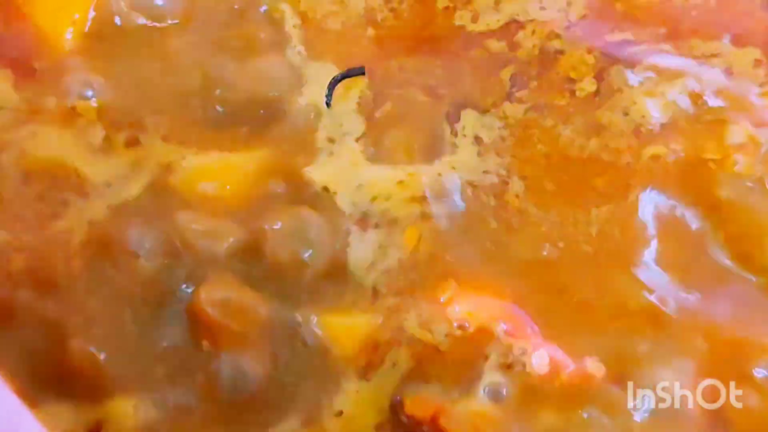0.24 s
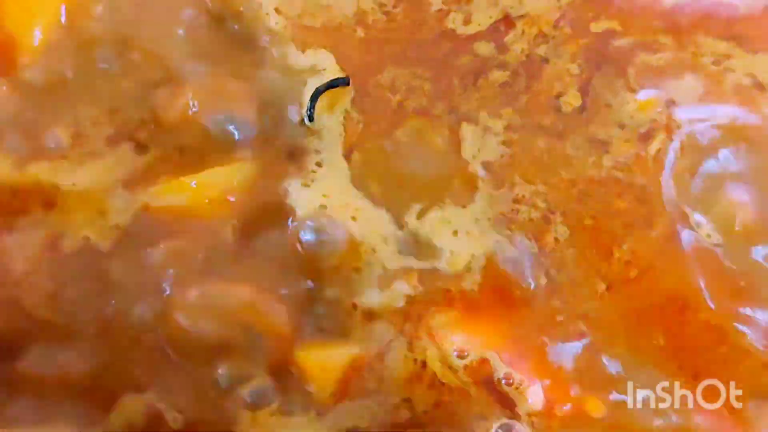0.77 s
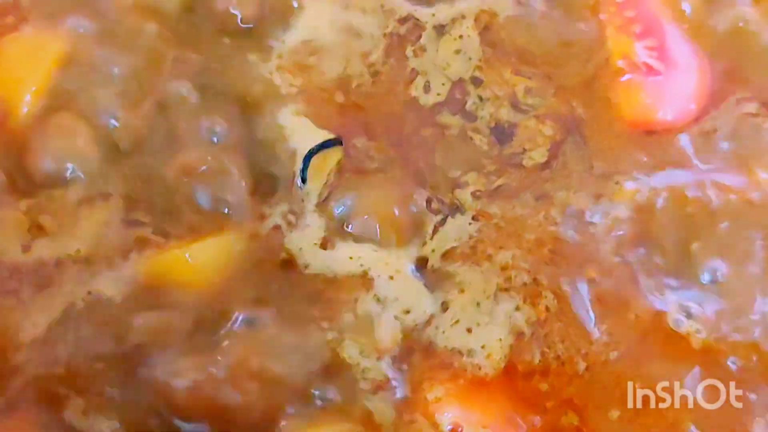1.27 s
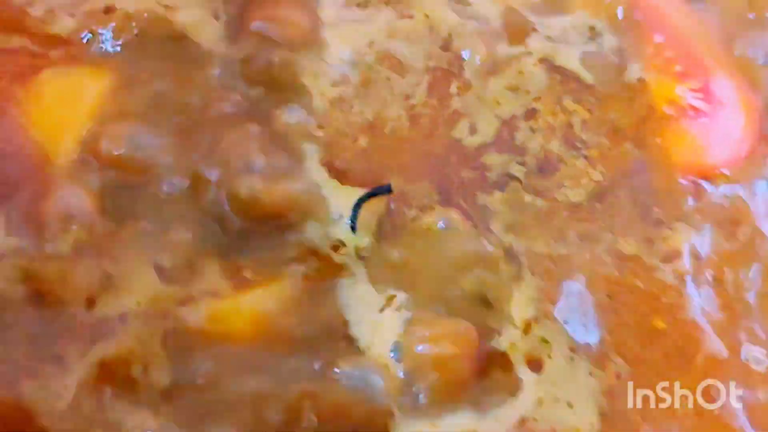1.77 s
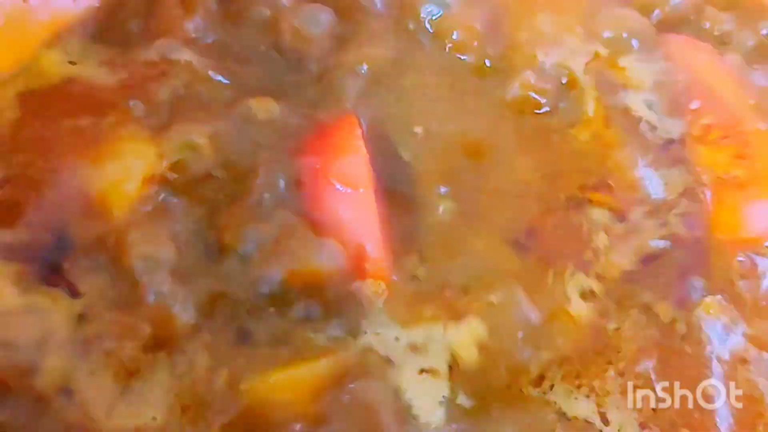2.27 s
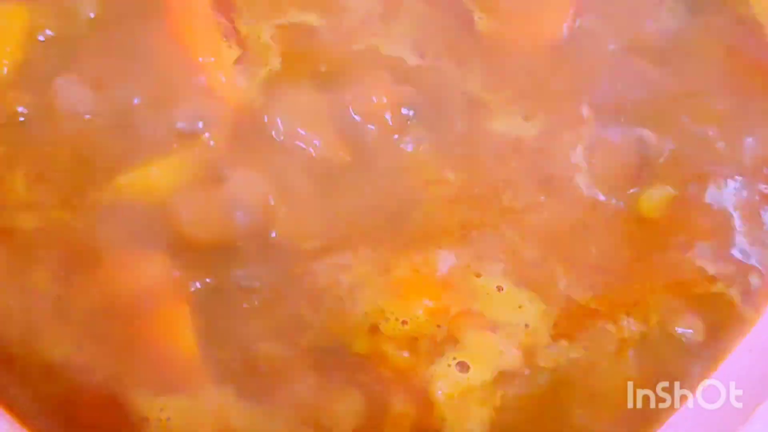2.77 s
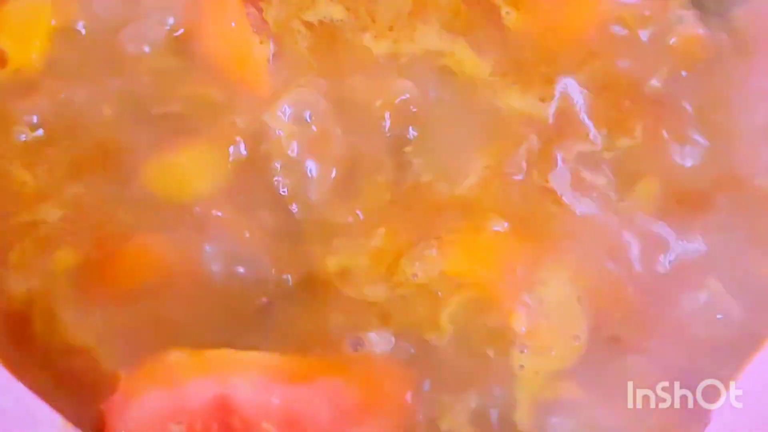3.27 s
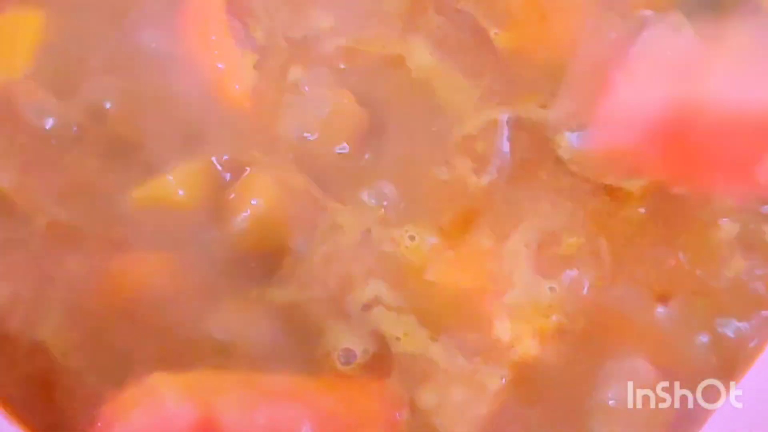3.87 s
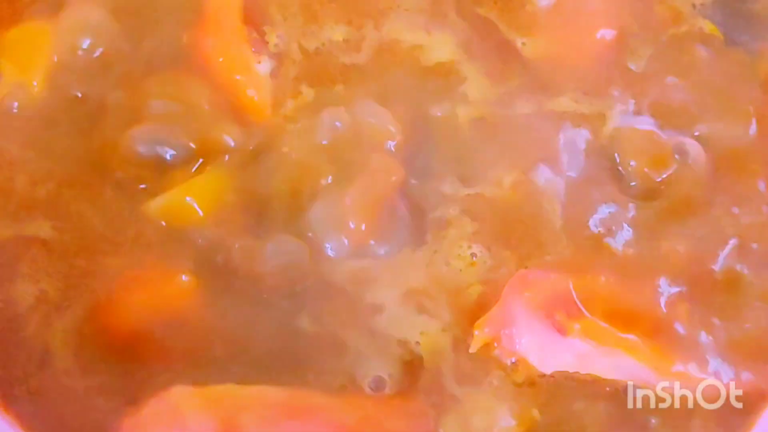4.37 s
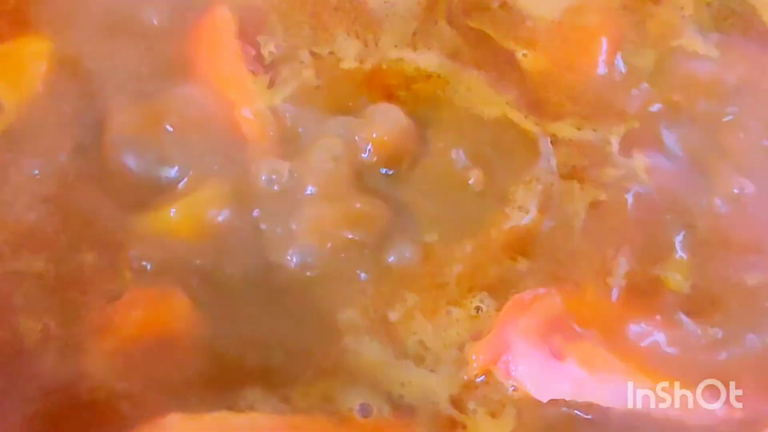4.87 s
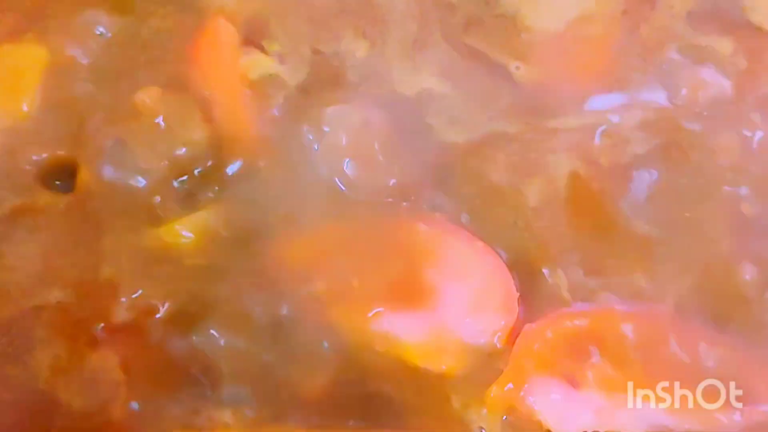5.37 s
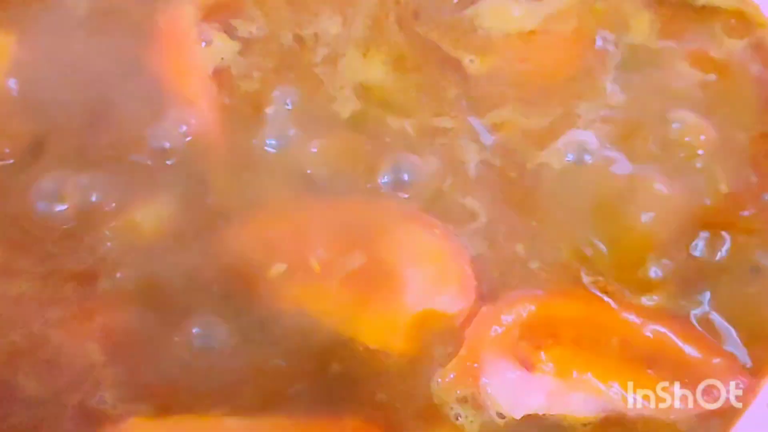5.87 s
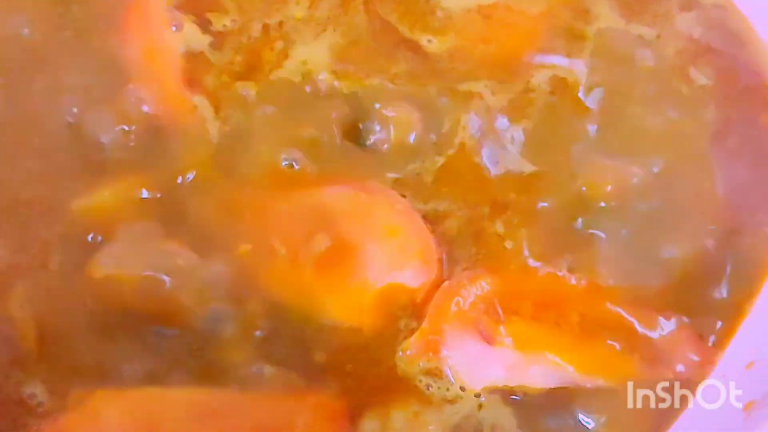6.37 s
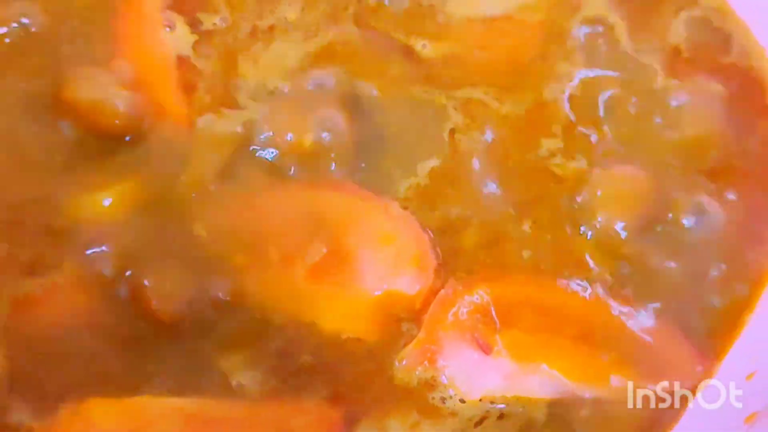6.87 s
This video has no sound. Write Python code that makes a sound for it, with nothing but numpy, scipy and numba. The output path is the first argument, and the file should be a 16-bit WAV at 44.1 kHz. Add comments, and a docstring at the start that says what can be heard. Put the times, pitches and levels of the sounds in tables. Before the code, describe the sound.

Close stereo listening above thick curry simmering on a gas stove in a kitchen. From 0 to 2.6 seconds the level is low: a soft rumbling roar of flame and boil, faint deep hum, fine fizzing ticks leaning left, and occasional muted plops around 0.5, 1.3 and 1.8. At 2.1 a piece drops in with a short wet slap and a tiny spray. At about 2.65 everything falls almost silent, then fades in by 3.0, noticeably louder. The boil is now dense, with hollow bubbles ringing in the pot, sharp bursting skins, thin steam hiss and high gas-jet whistle. Small slaps come at 3.1, 4.0 and 5.2. Low hum swells towards 4.3 and fades after 5. A gentle steam puff and faint thin whines pass between 5.5 and 6.3; a strong plop pops near 6.5, and simmering continues to the end at about 7.1.

```python
"""A kitchen, close above a pot of thick curry simmering on a gas stove, heard at a left and a right port.
Flame and boil are noise shaped by standing waves; steam hiss and jet whistles are noise in higher bands.
Machines and faint whines are wavering sines. Bubbles are damped gliding sines that excite the pot's air;
bursting skins are shorter ones, and dropped pieces splash as decaying noise with short ringing notes.
The sound dips once to near silence and fades back in louder."""
import sys
import numpy as np
from scipy import signal
from scipy.fft import rfft, irfft, next_fast_len
from scipy.io import wavfile
from scipy.ndimage import uniform_filter1d
from numba import njit

SR = 44100
rng = np.random.default_rng(int(sys.argv[2]) if len(sys.argv) > 2 else 0)


def master(y):
    """Save y as 16-bit WAV."""
    cut = np.clip(np.atleast_2d(y).T, -1, 1)
    pcm = np.round(cut * 32767)  # scale
    wavfile.write(sys.argv[1], SR, pcm.astype(np.int16))


N = 314433

DIP_S, BACK_S, FULL_S = 2.648, 2.672, 2.97  # near silent from, fading in from, full at
STEAM_HZ = 2200  # above this the steam hiss takes over from the roar
PLOP_LAG_S, TICK_LAG_S = 0.00017, 0.0004  # the right port hears bubbles later


def undb(db):
    """Decibel law: the amplitude gain of a level in dB."""
    return 10 ** (np.asarray(db) / 20)


def level(x, db):
    """Mean-square normalisation: scale to an rms level in dB."""
    return x * undb(db) / np.sqrt(np.mean(x ** 2))


def over_time(table):
    """Linear interpolation: a level curve at every sample."""
    s, db = np.transpose(table)
    return np.interp(np.arange(N) / SR, s, db)


def over_hz(table, hz):
    """Logarithmic frequency: a spectrum joined by straight lines on a log axis."""
    f, db = np.transpose(table)
    return np.interp(np.log(hz + 1), np.log(f + 1), db)


def before_after(levels):
    """Step function: one value until the sound fades back in, another from then on."""
    return np.where(np.arange(N) < BACK_S * SR, *levels)


def window(a, b):
    """Sine-power envelope: a swell from silence to silence between two times in s."""
    progress = np.clip((np.arange(N) / SR - a) / (b - a), 0, 1)
    return np.sqrt(np.sin(np.pi * progress).clip(0))


def walk(rate):
    """Slow random modulation: levels held 1 / rate s and smoothed twice; spread near 1."""
    hold = int(SR / rate)
    steps = np.repeat(rng.standard_normal(N // hold + 1), hold)
    smooth = uniform_filter1d(uniform_filter1d(steps, hold), hold)
    return 1.746 * smooth[:N]


def ring(x, hz, width):
    """Simple resonance: two poles, gain 1 at the centre, width in Hz."""
    return signal.lfilter(*signal.iirpeak(hz, hz / width, fs=SR), x)


@njit
def grains(n, start, hz, cycles, size, glide, rise):
    """Damped oscillation: a sine of rising pitch swells over `rise` cycles, loses 8.7 dB in `cycles`."""
    y = np.zeros(n)
    for k in range(len(start)):
        w, phase, fall, grow = 2 * np.pi * hz[k] / SR, 0., 1., 1.
        stop = min(n, start[k] + int(6 * cycles[k] * SR / hz[k]))
        for i in range(start[k], stop):
            phase += min(3., w * (1 + glide * phase / (2 * np.pi * cycles[k])))
            fall *= np.exp(-hz[k] / SR / cycles[k])
            grow *= np.exp(-hz[k] / SR / rise)
            y[i] += size[k] * fall * (1 - grow) * np.sin(phase)
    return y


def bubbles(s, db, hz, pan_db, cycles, glide, rise, lag_s=PLOP_LAG_S):
    """Interaural time and level difference: damped notes reach the nearer left port first and louder."""
    # the envelope's maximum is divided out, so db sets the peak
    top = rise * np.log(1 + cycles / rise)
    peak = np.exp(-top / cycles) * (1 - np.exp(-top / rise))
    cycles = cycles + 0 * s  # one value per bubble
    ports = []
    for arrival_s, gain_db in ((s, pan_db / 2), (s + lag_s, -pan_db / 2)):
        start = (arrival_s * SR).astype(np.int64)
        ports.append(grains(N, start, hz, cycles, undb(db + gain_db) / peak, glide, rise))
    return np.array(ports)


def swarm(count, lo_hz, hi_hz, db, spread_db, loud_db, patchy_db):
    """Clustered random process: time, level with a long upper tail, pitch and left minus right dB."""
    u = rng.random((count, 4)).T
    busy = np.cumsum(undb(patchy_db * walk(12)))
    s = np.interp(u[0], busy / busy[-1], np.arange(N) / SR)
    tail_db = -spread_db * np.log(np.maximum(u[1], .06))
    size_db = db + loud_db[(s * SR).astype(int)] + tail_db
    return s, size_db, lo_hz * (hi_hz / lo_hz) ** u[2], 1 + 7 * u[3]


# Gain of the side (half-difference) noise: f/Hz, level/dB
SIDE_GAIN = [(60, -21), (110, -17), (200, -14), (380, -9), (700, -0.5), (1290, 2), (2380, -3), (4400, -0.5),
             (15000, -1)]
# Balance of the noise between the ports: f/Hz, left minus right level/dB
PORT_TILT = [(60, -2.5), (110, 4.5), (200, -1), (380, 2), (700, 0), (1290, 1.5), (2380, 4.5), (4400, -1.5),
             (8120, -2), (15000, 5)]
LEAD = 0.61  # share of the mid noise that, in the treble, enters the side a quarter cycle ahead


def flicker(colour, swell_db, own_db, rate):
    """Band-filtered noise of mean-port rms 1: half octaves swell together and flicker alone."""
    n = next_fast_len(N)
    hz = np.arange(n // 2 + 1) * SR / n
    gain = colour(hz)
    mid, side = rfft(rng.standard_normal((2, n))) * gain
    side = side + 1j * LEAD * mid * hz / (hz + STEAM_HZ)
    side = side * undb(over_hz(SIDE_GAIN, hz))
    tilt = undb(over_hz(PORT_TILT, hz) / 2)
    ports = np.array([(mid + side) * tilt, (mid - side) / tilt])
    half_octave = 2 * np.log2(hz / 20 + 1e-9)
    out, swell = 0, walk(2.86)
    for band in range(20):
        share = np.cos(np.pi / 2 * np.clip(half_octave - band, -1, 1))
        if np.max(share * gain) > 1e-3 * np.max(gain):  # skip empty bands
            band_noise = irfft(ports * share, n)[:, :N]
            out = out + band_noise * undb(swell_db * swell + own_db * walk(rate))
    return out / np.sqrt(np.mean(out.mean(0) ** 2))


def tone(hz, waver):
    """Frequency modulation: a sine of rms 1 whose pitch wanders by the fraction `waver`."""
    pitch = hz * (1 + waver * walk(4.26))
    return np.sqrt(2) * np.sin(2 * np.pi * np.cumsum(pitch) / SR)


# Low hum, swelling after the dip and dying away in steps; it also wavers: t/s, level/dB
HUM_LEVEL = [(0, -59.5), (.7, -57), (2.63, -61.5), (2.67, -50), (4.3, -45.5), (4.9, -47.5), (5.3, -54),
             (6.05, -55.5), (6.6, -56.5), (7.13, -74)]
# Second machine tone, heard only until the fade-in: t/s, level/dB
DRONE_LEVEL = [(0, -58), (.55, -58), (.85, -69), (1.5, -65.5), (2.2, -68), (2.63, -73)]
HUM_HZ, DRONE_HZ, WHIRR_HZ = 44.3, 31, 242


def hums(roar_db):
    """Near-periodic machine vibration: three wavering sines, alike at both ports."""
    drone = tone(DRONE_HZ, 0.012) * undb(over_time(DRONE_LEVEL))
    drone = drone * before_after((1, 0))
    hum = tone(HUM_HZ, 0.012) * undb(over_time(HUM_LEVEL) + 1.0 * walk(9))
    whirr = tone(WHIRR_HZ, 0.0039) * undb(roar_db - 12.0 + 2.4 * walk(6))
    return hum + drone + whirr


# Faint tones that come and go: from t/s, to t/s, f/Hz, rms level/dB before swell and waver
THIN_TONES = [(3.25, 3.514, 2239, -68), (3.84, 4.157, 2250, -67.5), (5.6, 6.25, 2230, -65.5),
              (5.78, 6.1, 1785, -65.5), (5.7, 6.28, 2115, -72), (6.36, 6.7, 2220, -70),
              (6.06, 6.62, 3146, -71)]


def thin_tones():
    """Amplitude and phase modulation: sines swell, waver and fade, a quarter cycle apart at the ports."""
    t = np.arange(N) / SR
    port_cycles = np.array([[0], [.25]])
    out = 0
    for a, b, hz, db in THIN_TONES:
        envelope = undb(db + walk(10)) * np.sqrt(2) * window(a, b)
        cycles = hz * t + .08 * walk(8) + port_cycles
        out = out + envelope * np.sin(2 * np.pi * cycles)
    return out


# Spectral density shared by roar and steam, only its shape matters: f/Hz, level/dB (per Hz)
NOISE_SPECTRUM = [(16, -13), (60, -5), (123, -4), (222, -3), (293, -13), (642, -16), (759, -20),
                  (1330, -22), (3000, -30), (3750, -28), (5230, -36), (6180, -30.5), (7600, -41),
                  (10000, -41.5), (16000, -40)]
# Standing waves of the kitchen and the pot's air: f/Hz, width/Hz (where the dB halve), lift/dB
STANDING_WAVES = [(26.4, 20, 10), (86.4, 18.5, 13.5), (102.4, 8.7, -12), (129.6, 37, 4.5), (197, 21.7, 6.5),
                  (235.8, 15, 7), (348.3, 51, 9), (413.7, 8.7, 9.5), (503, 25, 7), (645, 62, 11),
                  (1333, 160, 6.5), (2170, 840, 6.5)]


def roar_colour(hz):
    """Room modes: standing waves lift or dip the rumble of flame and boil."""
    lift_db = sum(db / (1 + (2 * (hz - f) / w) ** 2) for f, w, db in STANDING_WAVES)
    return undb(over_hz(NOISE_SPECTRUM, hz) + lift_db) / np.sqrt(1 + (hz / STEAM_HZ) ** 8)


def steam_colour(hz):
    """High-pass filtering: steam hiss is the upper part of the same spectrum."""
    return undb(over_hz(NOISE_SPECTRUM, hz)) / np.sqrt(1 + (STEAM_HZ / (hz + 1)) ** 8)


# Whistle bands of the gas jets: f/Hz, width/Hz (two standard deviations), relative level/dB
JET_BANDS = [(5982, 370, -1), (6410, 990, -5.5), (11910, 410, -5.5), (12840, 950, -15), (11200, 1020, -12)]
JET_ECHO_S, JET_ECHO = 0.00796, 0.46  # delay and strength of an echo in the burner


def jet_colour(hz):
    """Comb filtering: a short echo ripples the jets' whistle bands."""
    bands = sum(undb(db) * np.exp(-(2 * (hz - f) / w) ** 2 / 2) for f, w, db in JET_BANDS)
    return bands * np.abs(1 + JET_ECHO * np.exp(2j * np.pi * hz * JET_ECHO_S))


# The upper whistle's own swell: t/s, gain/dB at the band centre
UPPER_WHISTLE = [(0, -3.5), (2.63, 1), (3.2, 0.5), (4.2, 2.5), (5.8, 3), (6.4, -2.5), (7.13, 0)]


def jets():
    """Narrow-band jet noise: whistles flicker and the upper one swells by a resonance of varying gain."""
    jet = flicker(jet_colour, swell_db=0.42, own_db=1.2, rate=25)
    return jet + (undb(over_time(UPPER_WHISTLE)) - 1) * ring(jet, 11900, 4000)


# A swell of steam: from t/s, to t/s, f/Hz, width/Hz of each resonance, rms level/dB before the swell
STEAM_PUFF = (5.5, 6, 2800, 2200, -60.5)


def puff():
    """Uncorrelated turbulence noise: a brief hiss through two equal resonances, unrelated at the ports."""
    a, b, hz, width, db = STEAM_PUFF
    hiss = ring(ring(rng.standard_normal((2, N)), hz, width), hz, width)
    return level(hiss, db) * window(a, b) ** 2


# Pieces and drops slap the surface: t/s, rms level/dB before the decay, f/Hz, left minus right level/dB
SURFACE_SLAPS = [(2.0906, -54, 10000, 2), (2.096, -43.5, 9000, -5), (2.1035, -45.5, 4500, 4),
                 (2.195, -50.5, 6000, 1), (3.102, -46, 9000, 8), (4.0164, -41, 13000, -2),
                 (4.0231, -50, 9000, 3), (5.243, -41.5, 8000, 2)]
# Short ringing notes within the slaps: t/s, peak level/dB (mean of the ports), f/Hz
SLAP_RINGS = [(2.097, -47, 11800), (2.103, -48.5, 2370), (4.0163, -42, 10500), (4.0203, -47, 3100),
              (4.0231, -51, 6000), (5.243, -48, 3570), (5.2432, -50, 11500)]
SLAP_WIDTH, SLAP_RISE_S, SLAP_T60_S = 1.6, .0002, .007  # width is a multiple of the centre
SPRAY_DB, SPRAY_T60_S = -13, .045  # a softer spray trails each slap


def slaps():
    """Impulsive impact noise: two exponential decays shape each spray, with short damped sines added."""
    out = np.zeros((2, N))
    t = np.arange(int(.12 * SR)) / SR
    fall = 1000. ** (-t / SLAP_T60_S) + undb(SPRAY_DB) * 1000. ** (-t / SPRAY_T60_S)
    fall = fall * np.minimum(t / SLAP_RISE_S, 1)
    for s, db, hz, pan in SURFACE_SLAPS:
        noise = ring(rng.standard_normal((2, len(t))), hz, SLAP_WIDTH * hz)
        spray = level(noise, db) * fall
        i = int(s * SR)
        out[:, i:i + len(t)] += spray * undb([[pan / 2], [-pan / 2]])
    s, db, hz = np.transpose(SLAP_RINGS) * 1.
    # cycles in proportion to pitch: every ring decays equally fast
    return out + bubbles(s, db, hz, pan_db=1.8, cycles=hz * 0.00089, glide=0.043, rise=2.4, lag_s=0.)


# Single small bursts, loud and soft, placed by time: t/s, peak level/dB (mean of the ports), f/Hz
CLEAR_TICKS = [(0.0166, -45.5, 3570), (0.1, -51.5, 4040), (0.197, -50, 4110), (0.309, -48, 7560),
               (0.316, -50, 3870), (0.329, -51, 3900), (0.436, -53, 7800), (0.7889, -53, 3960),
               (0.9411, -47, 3800), (0.959, -52, 8750), (1.044, -49, 7980), (1.5071, -53, 8450),
               (1.5302, -49, 3680), (1.6009, -50, 8880), (1.7168, -47, 3400), (2.4055, -59, 8730),
               (2.4245, -53, 8700), (2.485, -50, 3650), (3.0178, -42, 10700), (3.2857, -47, 7600),
               (3.366, -45, 10500), (3.417, -52, 9500), (3.5505, -47, 9300), (3.772, -48, 9500),
               (3.826, -46, 9350), (3.956, -47, 9390), (4.405, -44, 9950), (4.4437, -46, 9140),
               (4.4546, -42, 10800), (4.516, -43, 3540), (4.5788, -43, 4120), (4.7185, -45, 10600),
               (4.816, -47, 3820), (4.8357, -47, 10500), (5.0385, -43, 3540), (5.142, -45, 9990),
               (5.2552, -45, 10200), (5.363, -42, 10900), (5.4926, -42, 3670), (6.0223, -39.5, 9500),
               (6.0734, -46, 10800), (6.2455, -46, 10600), (6.3094, -43, 9870), (6.559, -41, 3530),
               (6.7733, -47, 9790), (6.8471, -43, 3460), (7.0594, -39, 3700)]


def ticks(fizz_db):
    """Strongly damped oscillation: thin skins burst and die out in a few cycles."""
    s, db, hz = np.transpose(CLEAR_TICKS) * 1.
    pan_db = np.where(hz > 6000, 8., 2.5)  # high ones lie further to the left
    cycles = np.where(hz > 6000, 1.5, 2.4)
    clear = bubbles(s, db, hz, pan_db, cycles, glide=.05, rise=.5, lag_s=TICK_LAG_S)
    low_bursts = swarm(count=1100, lo_hz=3090, hi_hz=5000, db=-5.5, spread_db=5.0,
                       loud_db=fizz_db, patchy_db=3)
    low = bubbles(*low_bursts, cycles=2.7, glide=0.067, rise=0.59, lag_s=TICK_LAG_S)
    # the finest vary from a broad click to a short ring
    cycles = 0.53 * 5.6 ** rng.random(1500)
    high_bursts = swarm(count=1500, lo_hz=6970, hi_hz=12600, db=-1.5, spread_db=4.5,
                        loud_db=fizz_db, patchy_db=4)
    high = bubbles(*high_bursts, cycles=cycles, glide=0.081, rise=0.55, lag_s=TICK_LAG_S)
    return clear + low + high


# Large bubbles: t/s, peak level/dB (before the pot's air adds to it), f/Hz, snap minus note level/dB
LARGE_BUBBLES = [(0.499, -52, 630, -10), (0.582, -50.5, 650, -15), (1.262, -53, 617, -10),
                 (1.355, -49.5, 610, -13), (1.825, -51.5, 640, -9), (2.021, -51.5, 655, -17),
                 (2.395, -50, 612, -10), (2.575, -45, 1066, -4), (3.074, -42, 620, -8),
                 (3.166, -46.5, 615, -12), (3.246, -46, 580, 4), (3.401, -46, 627, -15),
                 (3.51, -48, 626, -9), (3.557, -57.5, 549, 17), (3.781, -39.5, 720, 3),
                 (3.801, -46, 720, 2), (3.894, -40, 664, -5), (3.955, -50, 643, -8), (3.978, -42, 626, -8),
                 (4.054, -44, 574, 0), (4.074, -37.5, 774, -7), (4.392, -41, 640, -7),
                 (4.425, -41, 653, -14), (4.527, -39.5, 696, 2.5), (4.534, -44, 810, 5),
                 (4.638, -47.5, 470, -11), (4.666, -41, 635, -12), (4.777, -45, 616, -12),
                 (5.015, -48, 580, -13), (5.187, -46, 597, -5), (5.289, -39, 1210, -12),
                 (5.31, -46.5, 680, 8.5), (5.438, -41, 666, -12), (5.52, -46, 644, 0.5),
                 (5.632, -45, 624, 3), (5.792, -47, 547, 0), (5.887, -40, 650, 3.5), (6.052, -48, 660, 11),
                 (6.233, -39, 1230, 6.5), (6.2394, -42, 970, -2), (6.372, -45.5, 630, -16),
                 (6.402, -48, 675, -14), (6.448, -44, 660, 0.5), (6.476, -41.5, 594, 4),
                 (6.49, -32.5, 1220, -21), (6.758, -41, 610, 1.5)]
# Modes of the air in the pot: f/Hz, width/Hz, relative level/dB
POT_MODES = [(610, 44, -7.5), (917, 29, -5.5), (1259, 29, -3), (1876, 110, 0)]


def plops(loud_db):
    """Cavity resonance: each bubble's snap and short gliding note ring on in the pot's air."""
    s, db, hz, snap_db = np.transpose(LARGE_BUBBLES) * 1.
    pan_db = np.where(hz > 1000, 8., 5.)
    cycles = np.where(snap_db > 0, 1.2, 2.2)  # a hard snap leaves a shorter note
    big = bubbles(s, db, hz, pan_db, cycles, glide=.07, rise=1.8)
    snap = bubbles(s + 0.001297, db + snap_db, 1350 + 0 * s, pan_db=5.6,
                   cycles=0.46, glide=0.0047, rise=0.24)
    # the skin tears a second time a moment later
    snap = snap + undb(-6) * np.roll(snap, int(0.003495 * SR), axis=1)
    # the collapsing crater spits a few smaller bubbles
    u = rng.random((len(s), 5, 3)).T
    spit_s = (s + 0.00409 + .022 * u[0]).ravel()
    spit_db = (db - 13 - 8 * u[1]).ravel()
    spit_hz = (hz * .8 * 2.2 ** u[2]).ravel()
    after = bubbles(spit_s, spit_db, spit_hz, pan_db=3.6, cycles=1.6, glide=.09, rise=.3)
    small_swarm = swarm(count=800, lo_hz=472, hi_hz=1124, db=-7.0, spread_db=3.0,
                        loud_db=loud_db, patchy_db=3.5)
    small = bubbles(*small_swarm, cycles=1.26, glide=0.069, rise=0.44)
    tiny_swarm = swarm(count=500, lo_hz=1095, hi_hz=3000, db=-12.5, spread_db=5.0,
                       loud_db=loud_db, patchy_db=4)
    tiny = bubbles(*tiny_swarm, cycles=1.47, glide=0.1, rise=0.64)
    notes = big + snap + after + small + tiny
    pot_air = sum(undb(d) * ring(notes, f, w) for f, w, d in POT_MODES)
    return notes + undb(4.5) * pot_air


# base levels (before the fade-in, from it on) in dB; fizz is the reference for the small bursts
ROAR_DB, STEAM_DB = (-57, -48.5), (-73.5, -66)
JET_DB, FIZZ_DB = (-72.5, -65.5), (-63.5, -59.5)


def scene():
    """Linear superposition: the pressures of all sources add at the two ports."""
    roar_db = before_after(ROAR_DB)
    roar = undb(roar_db) * flicker(roar_colour, swell_db=0.089, own_db=1.0, rate=8.3)
    steam = undb(before_after(STEAM_DB)) * flicker(steam_colour, swell_db=0.72, own_db=1.0, rate=25)
    jet = undb(before_after(JET_DB)) * jets()
    background = hums(roar_db) + thin_tones() + roar + steam + jet + puff()
    return background + slaps() + ticks(before_after(FIZZ_DB)) + plops(roar_db)


TOP_HZ = 15800


def record(dry):
    """Gain envelope and low-pass filtering: one dip to near silence, a fade back in, no extreme treble."""
    times = [DIP_S - .002, DIP_S, BACK_S, BACK_S + 0.0009, FULL_S]
    fade = np.interp(np.arange(N) / SR, times, [0.96, 0.015, 0.0051, 0.071, 1])
    lowpass = signal.ellip(10, .2, 80, TOP_HZ, fs=SR, output="sos")
    return signal.sosfilt(lowpass, dry * fade)


dry = scene()
out = record(dry)
master(out)
```